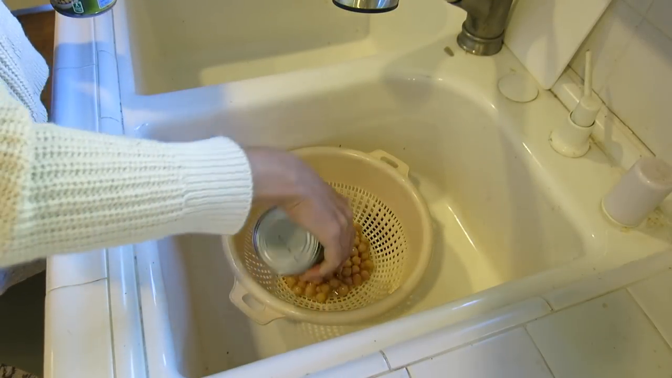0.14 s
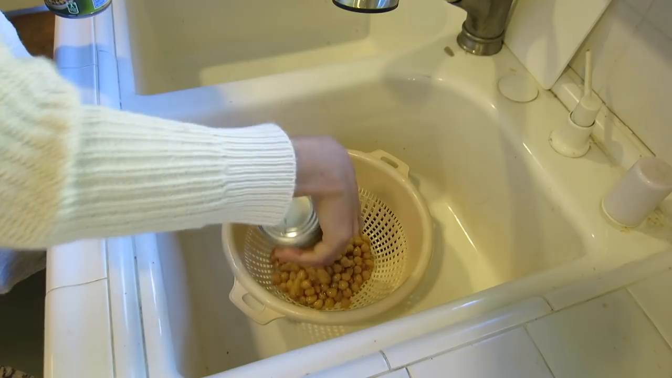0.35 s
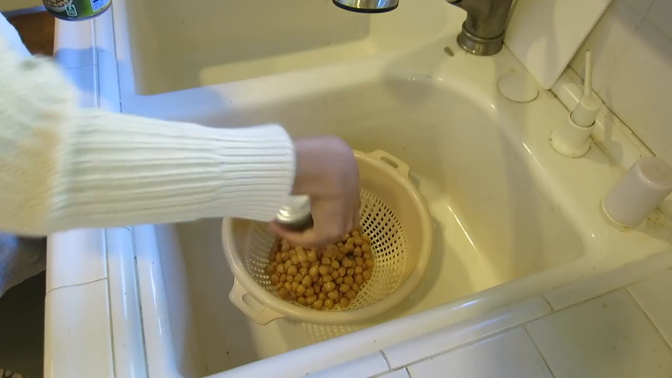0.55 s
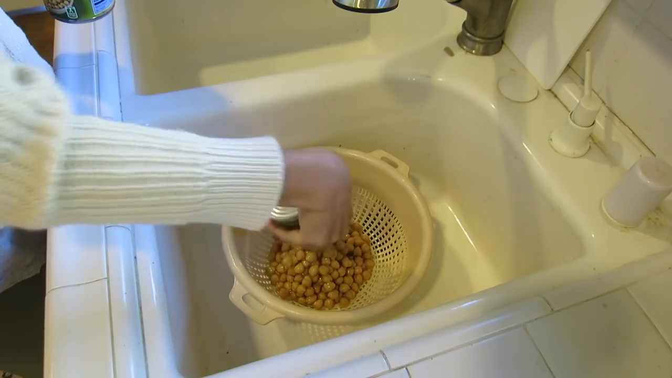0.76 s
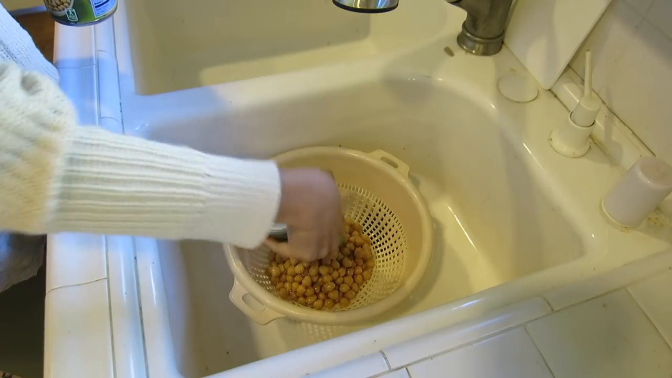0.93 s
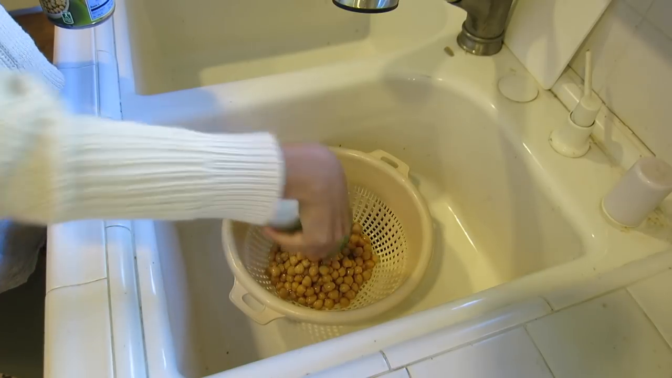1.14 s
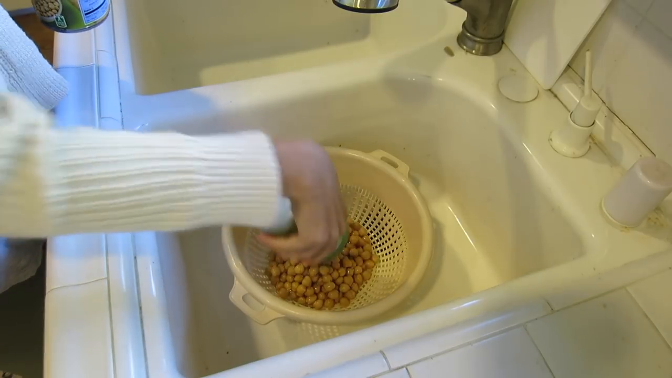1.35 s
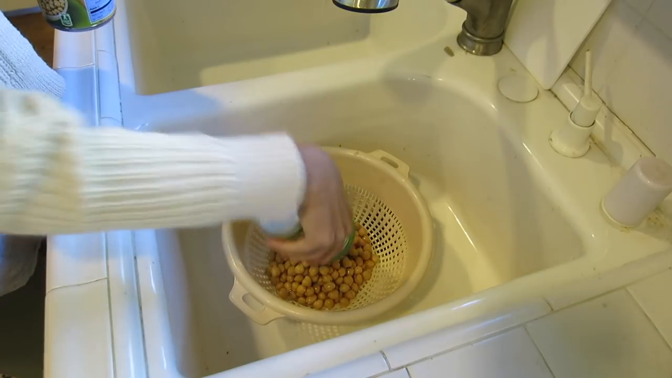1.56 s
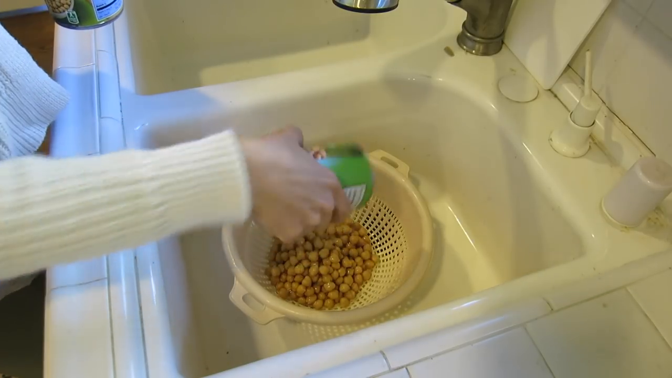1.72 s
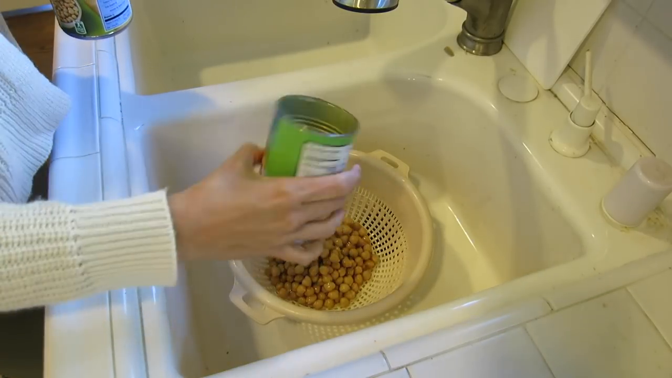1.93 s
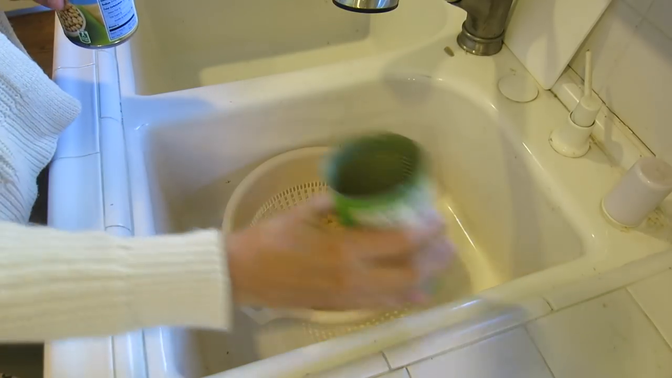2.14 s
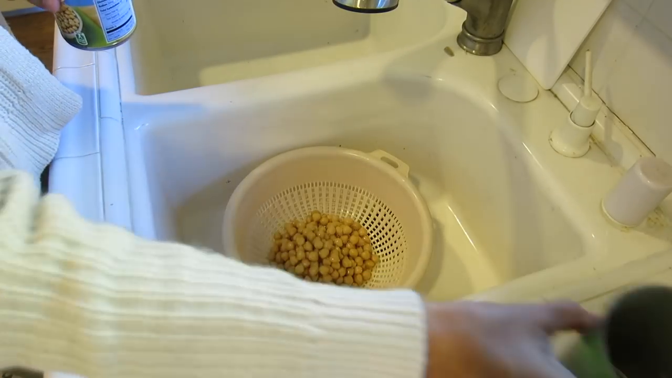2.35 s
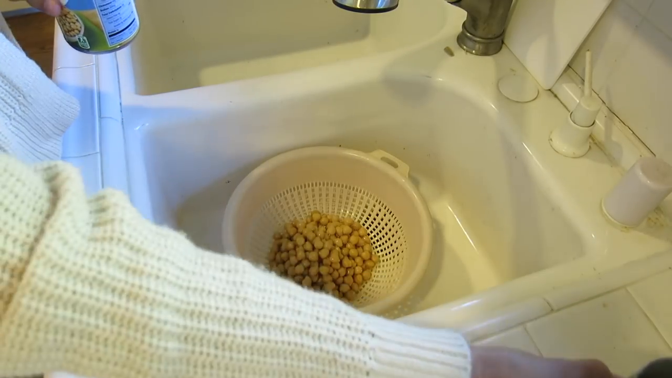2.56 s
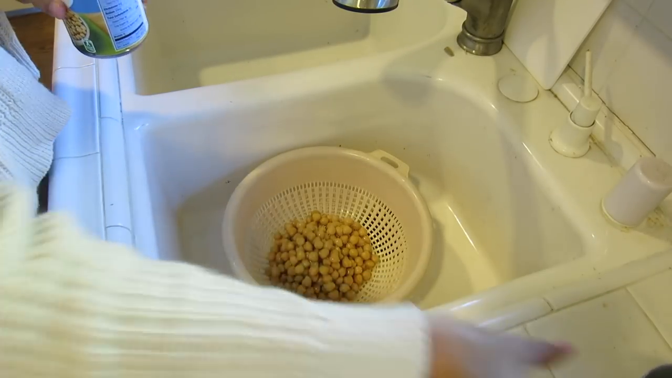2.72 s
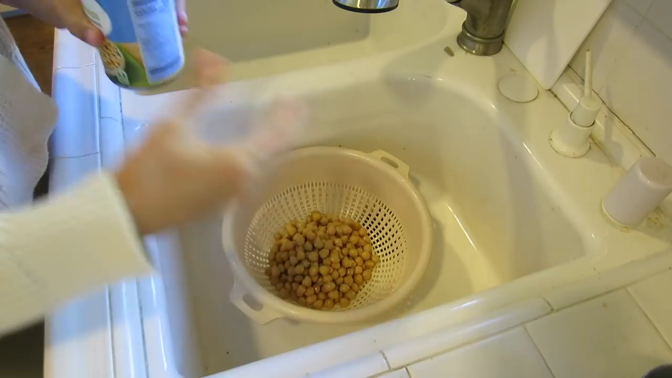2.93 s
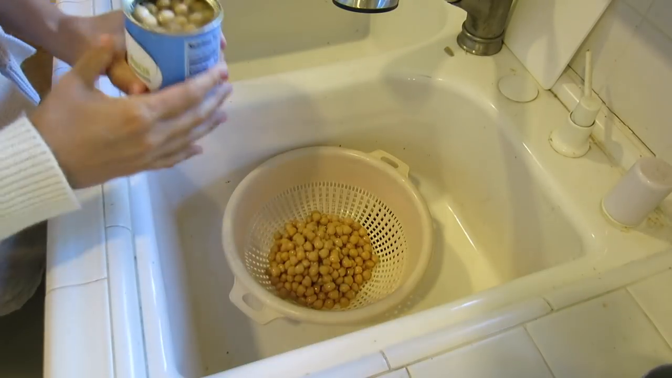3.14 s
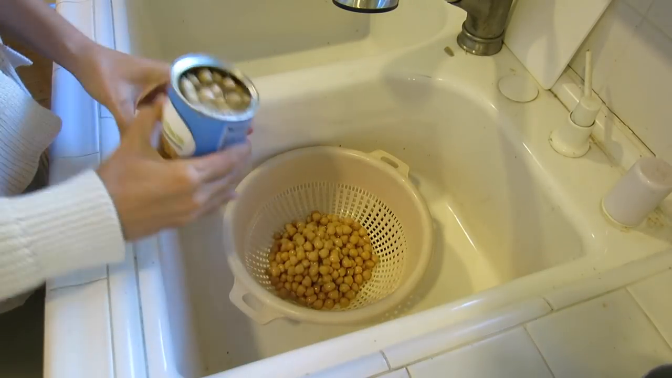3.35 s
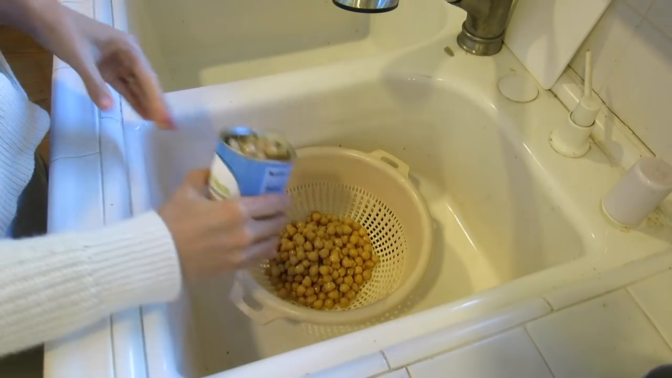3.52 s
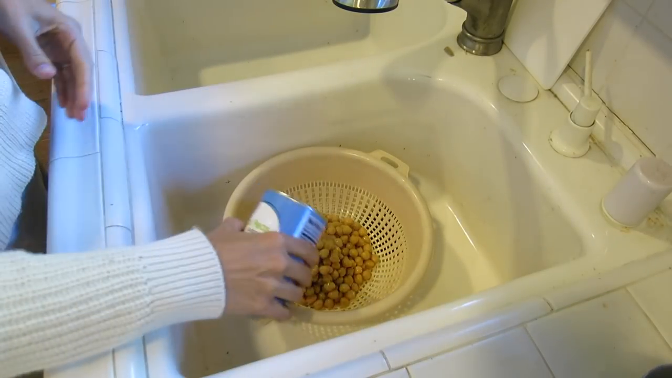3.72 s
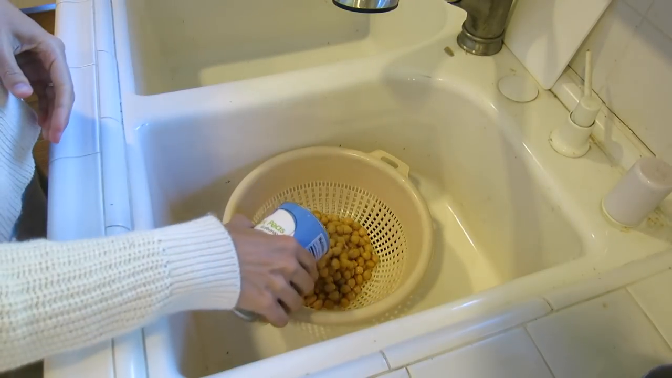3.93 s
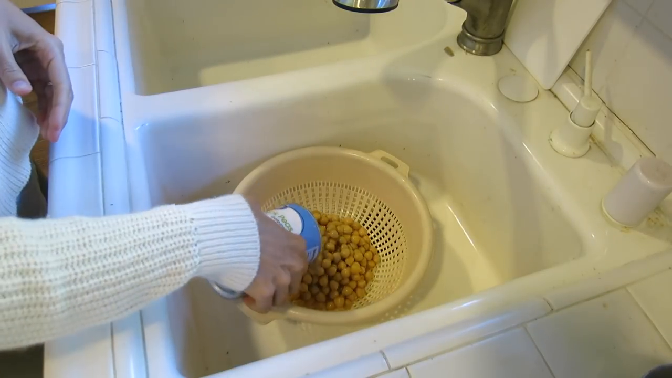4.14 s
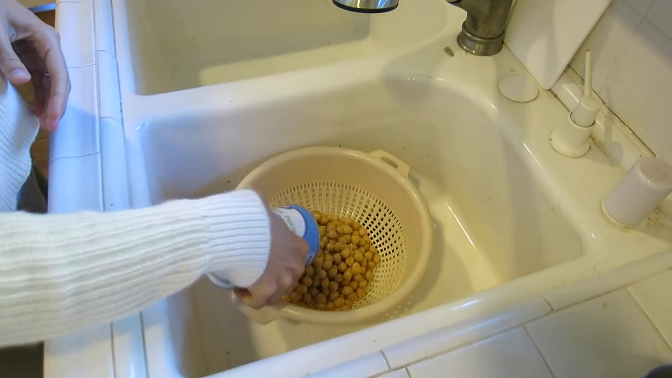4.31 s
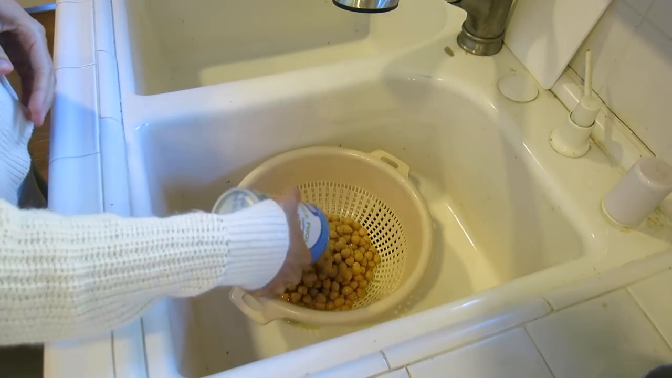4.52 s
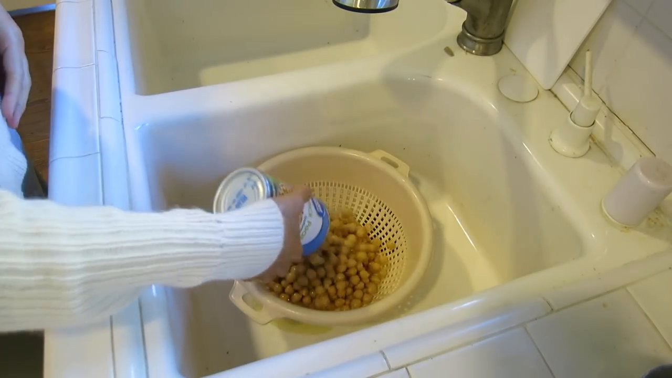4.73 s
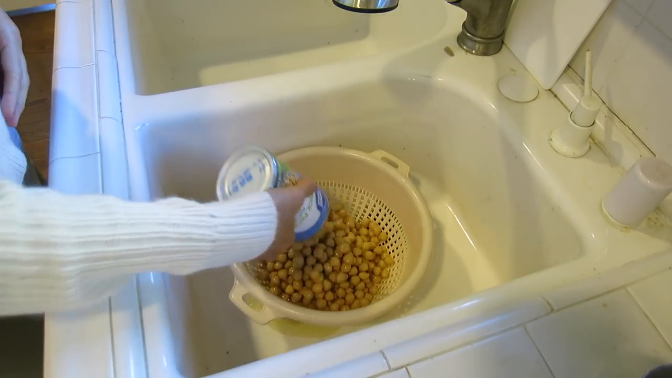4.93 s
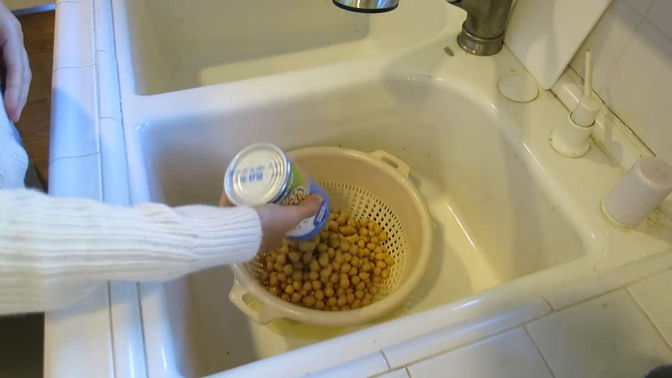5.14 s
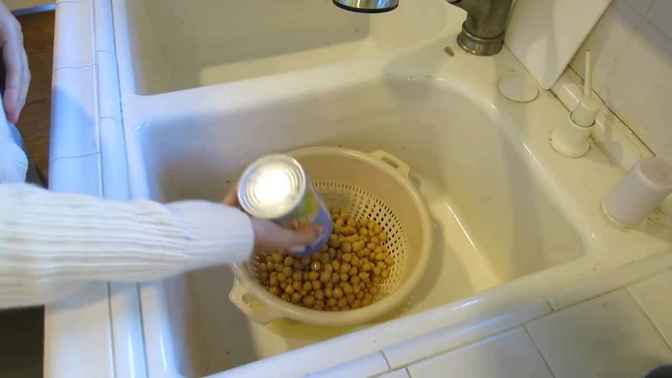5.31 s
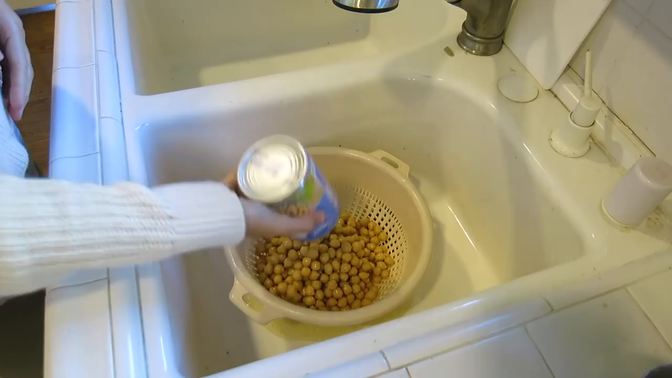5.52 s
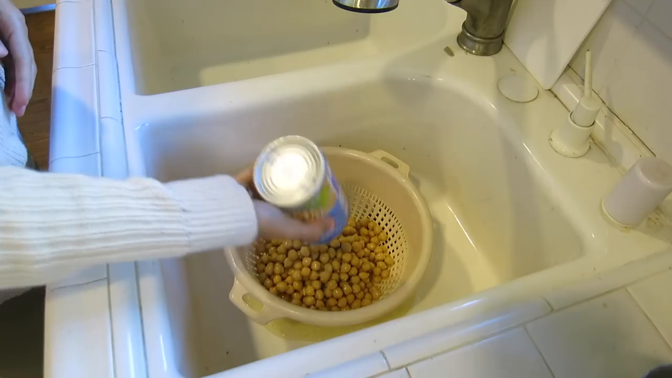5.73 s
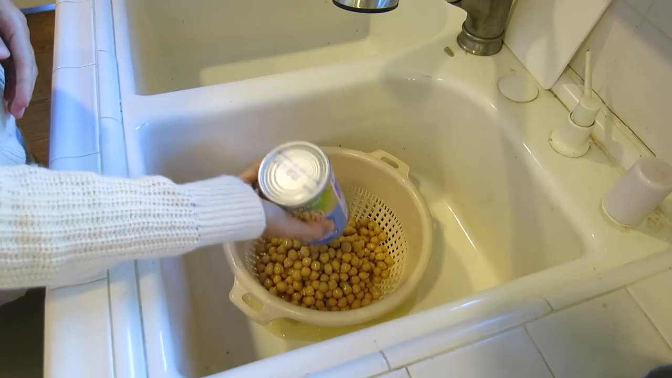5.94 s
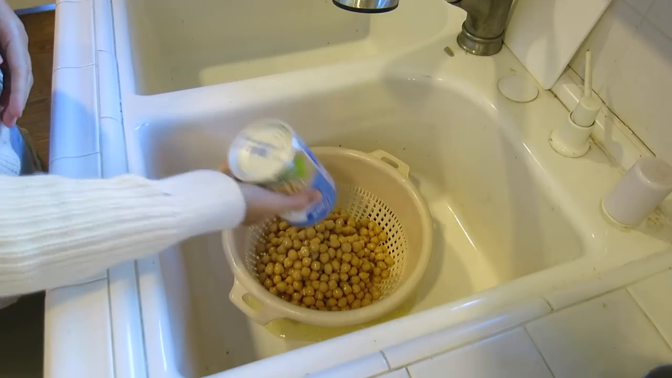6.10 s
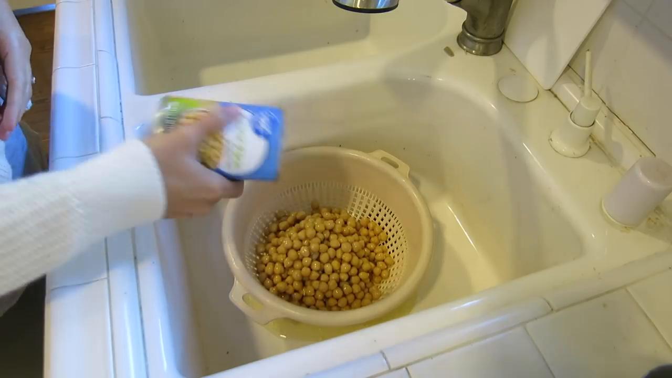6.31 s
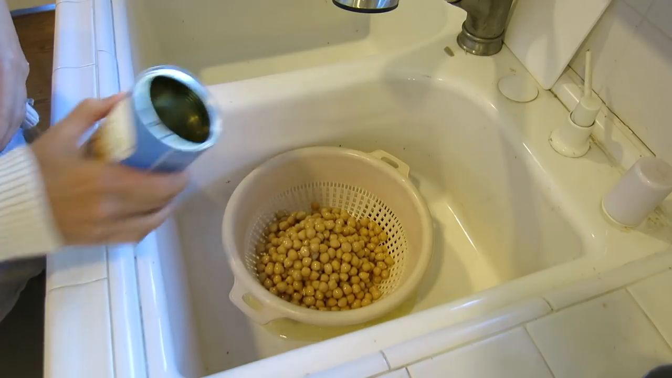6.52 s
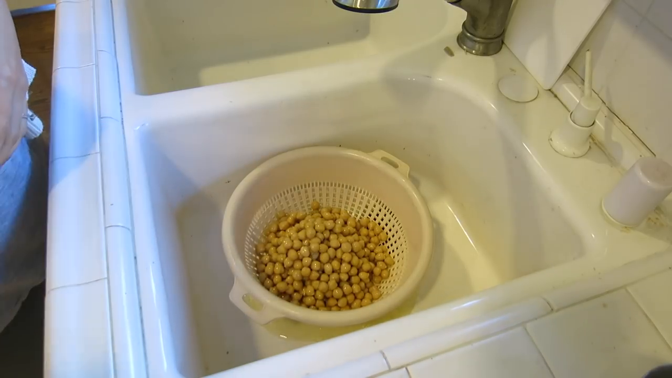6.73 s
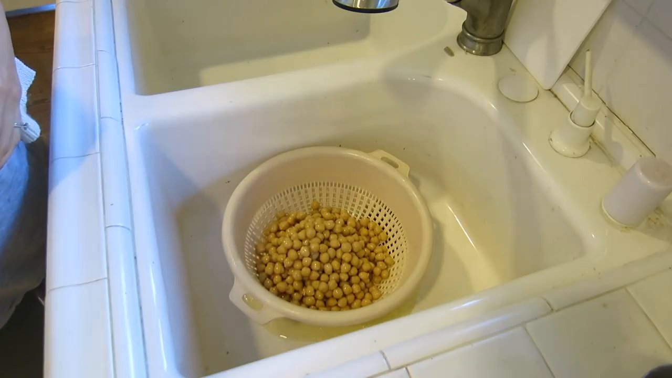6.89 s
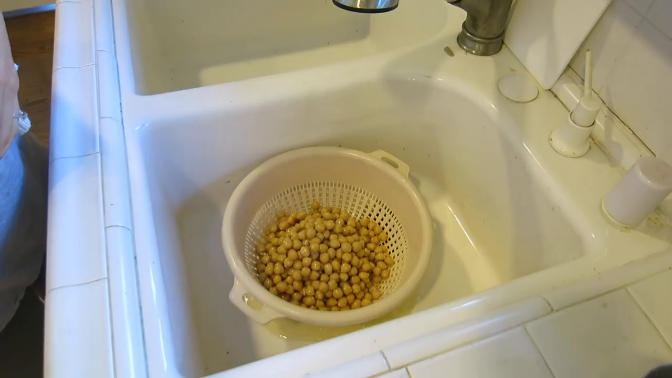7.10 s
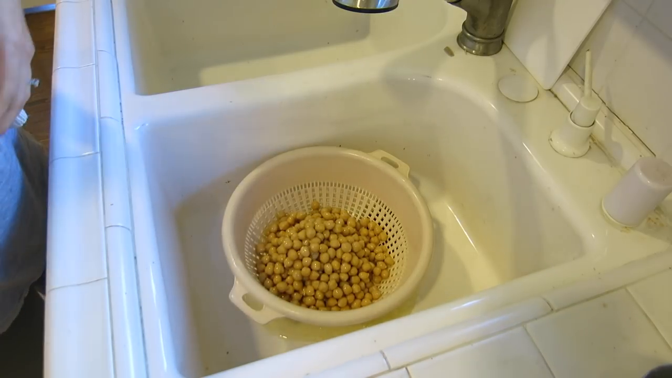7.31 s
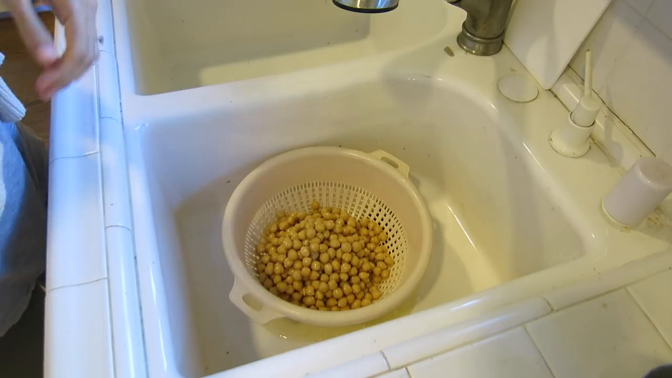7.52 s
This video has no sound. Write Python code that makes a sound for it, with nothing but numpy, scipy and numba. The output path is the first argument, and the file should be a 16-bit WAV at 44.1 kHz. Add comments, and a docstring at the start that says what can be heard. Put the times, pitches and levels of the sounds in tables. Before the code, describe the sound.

Stereo microphone near the basin, small live kitchen. Sharp can taps and fizzing brine come first, thinning to sparse clicks, then a hard steel clank. Label rustle and drops lead into a denser second pour, chickpeas slapping in clumps with gulping air. High drips thin out before a final clank that rocks and rings over faint hum and hiss.

```python
"""Wet chickpeas leave two cans for a colander in a sink: swarms of tiny bubbles squelch and crackle.
Clumps plop (and the can first rattles) as noise slaps with bubbles; brine drips plink, air gurgles and glugs.
Each empty can is set down hard on tiles: noise cracks, a bright tick and ringing steel modes.
Sink and kitchen add noise-tail echoes over rubbing hiss, a background of rumble and wide hiss, and fridge hum.
A gain control ducks overloads, most plainly at the two knocks, and recovers slowly."""
import sys
import numpy as np
from scipy import signal
from scipy.fft import rfft, irfft
from scipy.io import wavfile
from scipy.ndimage import uniform_filter1d
from numba import njit

SR = 44100
rng = np.random.default_rng(int(sys.argv[2]) if len(sys.argv) > 2 else 0)


def generate_wav(signal):
    """Clip the signal to [-1, 1] and save it as 16-bit WAV at the path in sys.argv[1]."""
    frames = np.transpose(np.atleast_2d(signal))
    scaled = np.clip(frames, -1, 1) * 32767
    pcm = np.round(scaled).astype(np.int16)
    wavfile.write(sys.argv[1], SR, pcm)


N = 337806
TIME = np.arange(N) / SR
TOP_HZ = 15800  # upper band limit


def amp(db):
    """Decibels to gain."""
    return 10 ** (np.asarray(db) / 20)


def unit(x):
    """Scale to rms 1."""
    return x / np.sqrt(np.mean(x ** 2))


def seconds(length_s):
    """Time axis of a short sound."""
    return TIME[:int(length_s * SR) + 2]


def fade(t, t60):
    """Exponential decay, 60 dB in t60."""
    return np.exp(-np.log(1000) * t / t60)


def add(track, start_s, sound):
    """Mix a sound into a track at start_s."""
    i = min(max(int(start_s * SR), 0), N)
    track[i:i + len(sound)] += sound[:N - i]


def colour(x, points, keep_power=True, size=4096):
    """Minimum-phase filter through (Hz, dB) points; by default white noise keeps its power."""
    hz, db = np.transpose(points)
    bin_hz = np.fft.rfftfreq(size, 1 / SR)
    gain = amp(np.interp(np.log(bin_hz + 1), np.log(hz), db))
    # folding the cepstrum makes the response causal
    cepstrum = irfft(np.log(gain))
    cepstrum[1:size // 2] *= 2
    cepstrum[size // 2 + 1:] = 0
    response = irfft(np.exp(rfft(cepstrum)))
    if keep_power:
        response = response / np.linalg.norm(response)
    return signal.fftconvolve(x, response)[:N]


def walk(rate_hz):
    """Smooth random wander with rms 1, one new value per 1 / rate_hz."""
    k = int(SR / rate_hz)
    steps = np.repeat(rng.standard_normal(N // k + 1), k)[:N]
    return unit(uniform_filter1d(uniform_filter1d(steps, k), k))


def bursts(starts_s, levels_db, rise, t60):
    """A short decaying rush of noise for each contact; rise and t60 in s."""
    out, t = np.zeros(N), seconds(t60 + rise)
    shape = (1 - np.exp(-t / rise)) * fade(t, t60)
    shape = shape / shape.max()
    for start_s, level_db in zip(starts_s, levels_db):
        add(out, start_s, amp(level_db) * shape * rng.standard_normal(len(t)))
    return out


def bubble(hz, cycles, glide):
    """A damped ring whose pitch climbs as the bubble nears the surface."""
    t = seconds(cycles / hz)
    age = t * hz / cycles  # 0 to 1 over its life
    ring = np.sin(2 * np.pi * hz * t * (1 + glide * age / 2))
    return ring * fade(age, 0.84) * (1 - np.exp(-t * hz))


def grains(low_hz, high_hz, cycles, spread_db, count):
    """A swarm of tiny bursting films and bubbles of all sizes, rms 1."""
    out = np.zeros(N)
    for when, pitch, size in rng.random((count, 3)):
        hz = min(low_hz * (high_hz / low_hz) ** pitch, TOP_HZ)
        strength = amp(spread_db * min(-np.log(1 - size), np.pi))
        add(out, when * N / SR, strength * np.sqrt(hz) * bubble(hz, cycles, glide=0.25))
    return unit(out)


# peas sliding out, one table per can, levels before trim: time_s, squelch_db, crackle_db
POUR_LEVELS = [
    [(0.0, -53, -48), (0.13, -45, -41.5), (0.49, -51, -59.5), (0.89, -52, -63.5), (1.09, -59.5, -67),
     (1.54, -56, -71), (1.89, -61, -69), (2.21, -65, -84), (2.4, -53, -81)],
    [(3.7, -60, -56.5), (3.89, -49, -53), (4.05, -48, -45), (4.22, -39, -46), (4.5, -46, -48.5),
     (4.89, -33.5, -57), (5.01, -35, -50), (5.61, -55.5, -82), (5.8, -68, -73)],
]
# squelch spectrum: freq_hz, level_db
SQUELCH_SPECTRUM = [(120, -23), (280, 3.5), (550, -0.5), (1200, 2.5), (2200, -6), (3300, -19),
                    (6000, -22.5)]
# brine crackle spectrum: freq_hz, level_db
CRACKLE_SPECTRUM = [(1500, 10.5), (3300, -10.5), (5500, -5.5), (10000, -4.5), (12500, -3.5), (15000, -15)]
# span of the wet heap's fizz: start_s, end_s
DRAIN_SPAN = (3.9, 7.3)
DRAIN_FIZZ_DB = -69


def pouring(squelch_trim_db=-7.5, crackle_trim_db=-1.0, patchy_db=3.0):
    """Sticky peas part: a dense low squelch and a fine crackle of brine, plus a faint fizz as it drains."""
    squelch = grains(low_hz=255.0, high_hz=4620, cycles=10.2, spread_db=4.0, count=8000)
    squelch = unit(colour(squelch, SQUELCH_SPECTRUM))
    crackle = grains(low_hz=2506, high_hz=16700, cycles=12.8, spread_db=7.0, count=14000)
    # peas let go in fits: patchy crackle
    crackle = unit(colour(crackle, CRACKLE_SPECTRUM) * amp(patchy_db * walk(70)))
    draining = (TIME > DRAIN_SPAN[0]) * (TIME < DRAIN_SPAN[1])
    out = crackle * amp(DRAIN_FIZZ_DB) * draining
    silent = dict(left=-np.inf, right=-np.inf)  # outside each pour
    for pour in POUR_LEVELS:
        time_s, squelch_db, crackle_db = np.transpose(pour)
        out += squelch * amp(np.interp(TIME, time_s, squelch_db, **silent) + squelch_trim_db)
        out += crackle * amp(np.interp(TIME, time_s, crackle_db, **silent) + crackle_trim_db)
    return out


# plops of landing clumps; the first rows near 2 kHz are can rattles and knocks
# levels before trim: start_s, slap_db, body_db, pitch_hz
PLOPS_AND_RATTLES = [(0.005, -22.5, -45, 1630), (0.092, -17.5, -63, 2250), (0.1, -24, -60, 2300),
                     (0.125, -27, -59, 2100), (0.185, -29, -51, 2000), (0.258, -33, -60, 3300),
                     (0.38, -39, -42.5, 1490), (0.425, -36.5, -44, 920), (0.46, -33.5, -49, 2800),
                     (0.628, -43, -43, 636), (0.8, -43, -43, 2100), (0.822, -39.5, -43.5, 1370),
                     (0.872, -50, -46, 700), (0.955, -44, -41, 637), (1.21, -48, -46, 664),
                     (1.501, -40, -63, 980), (1.835, -41.5, -68, 776), (4.185, -23, -46.5, 1356),
                     (4.194, -31, -48, 1880), (4.457, -31.5, -35, 1970), (4.533, -42, -29.5, 1090),
                     (4.573, -34, -29.5, 950), (4.609, -45, -51, 1070), (4.69, -18.5, -27, 1000),
                     (4.712, -26, -35, 2300), (4.742, -20.5, -32, 1480), (4.757, -11.5, -31, 1026),
                     (4.781, -29, -30, 755), (4.793, -28, -38, 1300), (4.817, -19.5, -38, 950),
                     (4.845, -15, -34, 1300), (4.856, -25, -35, 804), (4.89, -16, -35, 1150),
                     (4.903, -24, -38, 1500), (4.966, -25.5, -28.5, 890), (5.002, -21.5, -29, 900),
                     (5.04, -29, -49, 1010), (5.118, -37, -43, 1120), (5.158, -33, -26, 820),
                     (5.342, -23.5, -28, 810), (5.538, -28.5, -40, 1566), (5.634, -23, -38.5, 1730)]
# dull body spectrum: freq_hz, level_db
BODY_SPECTRUM = [(40, -61), (130, -18), (250, 4.5), (550, 4.5), (900, -6), (1500, -31), (4000, -33.5)]
# slap spectrum: freq_hz, level_db
SLAP_SPECTRUM = [(60, -55), (300, -11), (750, 2), (1150, -3.5), (2200, 3), (3200, -15), (6000, -24.5),
                 (15000, -37)]


def plops_and_rattles(thud_db=-4, bump_db=-4, bump_hz=450, spatter_db=-11, pocket_db=5,
                      followers_db=-6, scatter=0.381, count=6):
    """Each plop or rattle: dull noise body, quick noise slap, one bubble ring, then smaller rings and bumps."""
    starts_s, slaps_db, bodies_db, _ = np.transpose(PLOPS_AND_RATTLES)
    out = colour(bursts(starts_s, bodies_db + thud_db, rise=0.0042, t60=0.1), BODY_SPECTRUM)
    out += colour(bursts(starts_s, slaps_db + spatter_db, rise=0.00017, t60=0.034), SLAP_SPECTRUM)
    for start_s, slap_db, body_db, hz in PLOPS_AND_RATTLES:
        add(out, start_s, amp(slap_db + pocket_db) * bubble(hz, cycles=17.4, glide=0.13))
        delays_s = .016 * rng.random(count)
        # for a clump: peas that follow and bump the colander
        for delay_s, pitch, weight in zip(delays_s, *rng.standard_normal((2, count))):
            follower = bubble(hz * np.exp(scatter * pitch), cycles=20, glide=0.78)
            bump = bubble(bump_hz * np.exp(0.35 * weight), cycles=6.2, glide=0.05)
            later = fade(delay_s, t60=0.11)
            add(out, start_s + delay_s, later * amp(slap_db + followers_db) * follower)
            add(out, start_s + delay_s, later * amp(body_db + bump_db) * bump)
    return out


# wet snaps and taps on the can, levels before trim: start_s, level_db
CLICKS = [(0.0054, -17.5), (0.0482, -19.5), (0.0927, -24.5), (0.114, -30), (0.126, -31), (0.2578, -28),
          (0.294, -34.5), (0.39, -33), (0.4075, -24.5), (0.417, -32), (0.4584, -33), (0.4742, -30.5),
          (0.775, -21), (1.0142, -41), (1.8438, -39), (1.9712, -39.5), (2.0493, -45.5), (2.1723, -38),
          (2.2509, -42.5), (3.128, -37), (3.2595, -35.5), (3.3743, -22.5), (3.972, -39), (3.9888, -28),
          (4.001, -31), (4.029, -29.5), (4.077, -25.5), (4.2378, -29), (5.8416, -33.5)]
# bright click spectrum, also the cans' tick: freq_hz, level_db
CLICK_SPECTRUM = [(500, -21), (2000, -2.5), (3200, -11), (5000, -1), (8000, -0.5), (11500, 2.5),
                  (15000, -11)]


def snaps(spray_db=-10.0, pulse_db=12.0):
    """Bright clicks: a sharp pulse and a few milliseconds of spray."""
    starts_s, levels_db = np.transpose(CLICKS)
    out = bursts(starts_s, levels_db + spray_db, rise=0.0017, t60=0.013)
    for start_s, level_db in CLICKS:
        add(out, start_s + 0.00056, amp([level_db + pulse_db]))
    return colour(out, CLICK_SPECTRUM)


# brine drops, level before trim, splash relative to it: start_s, level_db, pitch_hz, splash_db
DROPS = [(0.165, -10.5, 6270, -35), (0.892, -28, 4900, -11.5), (3.473, -26, 9500, -27),
         (3.6105, -23.5, 9860, -29), (3.64, -30.5, 7240, -15), (3.7367, -27, 9500, -13.5),
         (3.7855, -29, 6700, -4), (3.8346, -25.5, 8600, -13), (3.858, -31, 9300, -26),
         (3.905, -34, 9100, -11), (3.912, -21, 7400, -15), (3.971, -29.5, 6540, -27),
         (4.0636, -33.5, 4500, -13), (4.1026, -15.5, 9630, -22), (4.153, -35, 8200, -4),
         (4.2078, -30, 5230, -18), (4.2282, -29, 6200, -18), (4.309, -22, 5720, -31),
         (4.359, -32, 5700, -20), (4.4025, -33, 9810, -11), (4.438, -33, 5480, -15),
         (4.563, -49, 6900, -22), (4.6335, -33, 9730, -10), (4.648, -29, 9000, -13),
         (4.6945, -31, 9100, -6), (4.7315, -32, 7700, -6.5), (4.7535, -33, 4040, -2),
         (4.7905, -35, 6700, -4), (4.868, -29, 4870, -22), (4.9105, -28, 9100, -25),
         (5.006, -22, 7070, -27), (5.0406, -19, 7970, -16.5), (5.222, -41, 8430, -22),
         (5.2395, -26.5, 8950, -31), (5.2985, -22.5, 10050, -31), (5.3415, -28.5, 8300, -14),
         (5.437, -31, 8400, -16), (5.4835, -37, 9800, -23), (5.5445, -31.5, 6900, -20),
         (5.68, -34, 6400, -18), (5.7416, -33.5, 6200, -9), (5.801, -43, 9500, -13),
         (5.8292, -38, 6900, -8), (5.885, -29.5, 7000, -30), (5.9388, -31, 9100, -27),
         (5.9854, -33.5, 7400, -24), (5.9942, -34.5, 6400, -13.5), (6.027, -42, 9640, -9),
         (6.0565, -39.5, 8800, -9), (6.0884, -36.5, 9600, -6.5), (6.103, -38.5, 8900, -13),
         (6.138, -45, 9200, -11), (6.162, -45, 11900, -11), (6.2158, -35.5, 6760, -14),
         (6.2776, -47, 6400, -3), (6.3077, -38.5, 8000, -12.5), (6.3508, -33.5, 9800, -19),
         (6.38, -31, 9270, -18), (6.4867, -30.5, 9100, -14), (6.4967, -33, 7030, -7.5),
         (6.577, -39, 9200, -9), (6.6094, -36, 9300, -14), (6.765, -44.5, 5370, -1),
         (6.789, -44, 6250, -12), (6.835, -41, 7050, -15), (6.859, -42.5, 10200, -7),
         (6.9721, -41, 9440, -21), (7.0535, -27.5, 10400, -30), (7.064, -29, 10000, -24),
         (7.0946, -29.5, 11100, -17.5), (7.1284, -32.5, 6800, -27), (7.2526, -34, 11800, -10),
         (7.2704, -29.5, 6550, -22), (7.283, -30.5, 10200, -21)]
# splash spectrum: freq_hz, level_db
SPLASH_SPECTRUM = [(1000, -16), (2600, -15), (3300, -6), (3800, -12.5), (4600, -2), (6300, 3), (8000, 5),
                   (11500, 3), (15000, -3.5)]


def drips(ring_db=-2.0, satellite_db=-8, spread_s=0.0024, lag_s=.0011, scatter=0.22, count=3):
    """Each drop splashes, its trapped bubble gives one short plink, and a few weaker ones burst with it."""
    starts_s, levels_db, _, splashes_db = np.transpose(DROPS)
    splash = bursts(starts_s + lag_s, levels_db + splashes_db, rise=0.00031, t60=0.037)
    out = colour(splash, SPLASH_SPECTRUM)
    for start_s, level_db, hz, _ in DROPS:
        add(out, start_s + lag_s, amp(level_db + ring_db) * bubble(hz, cycles=92, glide=0.07))
        for delay_s, pitch in zip(spread_s * rng.random(count), rng.uniform(-0.56, 1, count)):
            satellite = bubble(hz * np.exp(scatter * pitch), cycles=85.0, glide=0.14)
            add(out, start_s + lag_s + delay_s, amp(level_db + satellite_db) * satellite)
    return out


# air squeezing in past the peas: start_s, start_pitch_hz, level_db
AIR_STRINGS = [(0.814, 1190, -43), (4.024, 1415, -30.5), (4.499, 1067, -25.5)]


def gurgles(climb_per_s=4.7, length_s=0.072, jitter=0.046, count=9):
    """A quick string of bubbles whose pitch climbs, with a little jitter, as air squeezes in."""
    out = np.zeros(N)
    for start_s, start_hz, level_db in AIR_STRINGS:
        for delay_s, pitch in zip(length_s * rng.random(count), rng.standard_normal(count)):
            hz = start_hz * np.exp(climb_per_s * delay_s + jitter * pitch)
            add(out, start_s + delay_s, amp(level_db) * bubble(hz, cycles=19, glide=0.25))
    return out


# gulped air ringing the can's cavity: start_s, pitch_hz, level_db, length_s
GULPS = [(0.313, 648, -51.5, 0.24), (0.602, 656, -46.5, 0.075), (0.8, 530, -43, .04),
         (0.935, 500, -40, 0.032), (1.025, 510, -43.5, 0.034), (4.53, 472.4, -36, 0.032),
         (4.72, 522, -35, 0.14), (4.913, 570, -33, 0.022), (4.96, 560, -24.5, 0.17),
         (5.138, 569, -31, .035), (5.179, 586, -22, 0.033), (5.255, 596, -44, .04),
         (5.349, 596, -21.5, 0.033)]
GLUG_SWELL_S = 0.0091
GLUG_RISE_PER_S = 0.15  # phase factor; relative pitch climbs at twice this


def glugs(sag_db_per_s=50, release_t60=0.084, rough_db=2.0, wobble_rad=0.39):
    """Air in the can swells into a hollow, slightly rising note, sags while air flows, then rings out."""
    out, t = np.zeros(N), seconds(.4)
    for start_s, hz, level_db, length_s in GULPS:
        swell = np.minimum(t / GLUG_SWELL_S, 1)
        release = fade(np.maximum(t - length_s, 0), release_t60)
        shape = swell * amp(-sag_db_per_s * t) * release
        phase = 2 * np.pi * hz * t * (1 + GLUG_RISE_PER_S * t) + wobble_rad * walk(87)[:len(t)]
        add(out, start_s, amp(level_db) * shape * np.sin(phase))
    return out * amp(rough_db * walk(110))


PING_S = 5.378  # second can runs empty
# modes of that can while held: freq_hz, level_db, t60_s
HELD_MODES = [(890, -45, 0.27), (1084, -50, 0.41), (3560, -55, 0.17), (4600, -55, 0.19), (5303, -56, .18),
              (6100, -52, 0.13)]


def can_ping():
    """The last peas leave the can in the hand, and its wall rings faintly."""
    out, t = np.zeros(N), seconds(.6)
    for hz, level_db, t60 in HELD_MODES:
        add(out, PING_S, amp(level_db) * np.sin(2 * np.pi * hz * t) * fade(t, t60))
    return out


# hands and sleeve sliding over paper labels: centre_s, level_db, half_width_s
RUB_STROKES = [(0.01, -57, 0.025), (0.406, -58, 0.029), (0.813, -55, 0.03), (1.743, -68.5, 0.22),
               (2.283, -64, 0.15), (3.285, -53.5, 0.12), (3.39, -49, 0.026), (4.095, -49, 0.057)]
# rub spectrum: freq_hz, level_db
RUB_SPECTRUM = [(500, -6), (3000, -17.5), (6000, -11.5), (11500, -2.5), (15500, -12)]


def rubs():
    """Skin and wool on paper: a fine, slightly uneven hiss that swells and fades."""
    pressure = np.zeros(N)
    for centre_s, level_db, half_width_s in RUB_STROKES:
        pressure += amp(level_db) * np.exp(-((TIME - centre_s) / half_width_s) ** 2)
    return pressure * amp(2 * walk(60)) * colour(rng.standard_normal(N), RUB_SPECTRUM)


# first can on the tiles, levels before trim: start_s, crack_db, ring_db
FIRST_CONTACTS = [(2.619, 7, -0.5), (2.6215, -5, -15.5), (2.645, -13, -24), (2.654, -6, -11),
                  (2.743, -25, -29.5)]
# second can, rocking before it settles, levels before trim: start_s, crack_db, ring_db
SECOND_CONTACTS = [(7.363, 7.5, 3), (7.366, 4.5, -16), (7.383, -8, -21), (7.395, -12, -27),
                   (7.447, -28, -9.5), (7.497, -14.5, -16), (7.514, -10, -14), (7.645, -28, -38)]
# modes of the first empty can, relative: freq_hz, level_db, t60_s
FIRST_MODES = [(432, -14, .14), (508, 1, 0.25), (572, -7, .2), (684, -16, 0.42), (967, -13, 0.42),
               (1087, -15, 0.45), (1283, -14, 0.42), (1347, -9, .34), (1380, -11, .4), (1658, -22, .35),
               (1980, -21, .3), (2164, -16, .3), (2225, -16, .33), (2309, -17, 0.38), (2365, -18, .36),
               (2545, -21, .36), (2910, -18, 0.18), (4485, -23, .33), (5340, -24, .37), (5523, -24, .42),
               (6982, -21, .2), (8750, -27, .17)]
# modes of the second empty can, relative: freq_hz, level_db, t60_s
SECOND_MODES = [(585, -15, .35), (631, -3.5, 0.68), (692, -6.5, 0.7), (740, -16, .3), (909, -16, 0.59),
                (1023, -11.5, .7), (1090, -4.5, 0.43), (1940, -10, 0.55), (2008, -13, 0.65),
                (2110, -12, .4), (2169, 0, 0.38), (2285, -12, .27), (2363, -10, 0.2), (2862, -27, 0.7),
                (3740, -20, .3), (3850, -19, 0.2), (5570, -21, .45), (5660, -15, .33), (6630, -19, 0.33),
                (8382, -19, 0.28), (9900, -27, .28), (11010, -24, 0.28), (11600, -22, 0.28),
                (12300, -26, .25)]
# first can's crack spectrum: freq_hz, level_db
FIRST_SPECTRUM = [(30, -68), (150, -27.5), (300, 0), (550, 9), (1000, 8), (1700, 7), (2400, 6.5),
                  (3400, -8.5), (5000, -0.5), (8000, -4), (11500, -1), (15000, -14)]
# second can's crack spectrum: freq_hz, level_db
SECOND_SPECTRUM = [(30, -67), (150, -34), (330, -7.5), (460, 1.5), (650, 17), (1050, 14), (1500, 3.5),
                   (2200, 8), (2700, -9), (3800, 0.5), (4700, -1), (5600, -8), (6100, -21), (6600, -3),
                   (7400, -13), (8500, -3), (10200, -6), (11500, 2.5), (15000, -12)]
CHATTER_HZ = 2000  # modes above this ring more and more smoothly


def can_knock(contacts, modes, spectrum, tick_db, crack_db, ring_db, buzz_db, buzz_t60, split,
              cluster_db, rough_db, count=4):
    """The rim cracks on tile, the thin steel rings on and buzzes against it; gives (crack, ring)."""
    starts_s, cracks_db, rings_db = np.transpose(contacts)
    crack = bursts(starts_s, cracks_db + crack_db, rise=0.0001, t60=0.012)
    # hard contact: one bright tick each
    tick = np.zeros(N)
    for start_s, level_db in zip(starts_s, cracks_db):
        add(tick, start_s + .0003, amp([level_db + tick_db]))
    buzz = bursts(starts_s, rings_db + buzz_db, rise=0.0038, t60=buzz_t60)
    ring, t = np.zeros(N), seconds(0.88)
    for hz, mode_db, t60 in modes:
        # seam and ribs split each mode into a close cluster
        split_hz = hz * (1 + split * rng.standard_normal(count))
        neighbours = np.sin(2 * np.pi * (np.outer(split_hz, t) + rng.random((count, 1))))
        cluster = np.sin(2 * np.pi * hz * t) + amp(cluster_db) * neighbours.sum(axis=0)
        # the chattering rim roughens it
        chatter = amp(rough_db * min(1, CHATTER_HZ / hz) * walk(149)[:len(t)])
        tone = cluster * fade(t, t60) * chatter
        for start_s, blow_db in zip(starts_s, rings_db):
            add(ring, start_s, rng.choice([-1, 1]) * amp(ring_db + blow_db + mode_db) * tone)
    return colour(crack + buzz, spectrum) + colour(tick, CLICK_SPECTRUM), ring


# echo side against mid: freq_hz, level_db
ECHO_WIDTH = [(60, -21.5), (260, -17), (600, -9), (1400, -3.5), (2400, -8.5), (4500, -26), (7000, -30),
              (9500, -10.5), (13000, -1)]


def echoes(x, delay, t60, treble_t60, db, split_hz=3000):
    """Dense reflections as decaying noise tails, shorter in the treble; times in s; gives (mid, side)."""
    t = seconds(1.0)
    low_pass = signal.butter(2, split_hz, fs=SR, output="sos")
    pair = []
    for noise in rng.standard_normal((2, len(t))):
        low = signal.sosfilt(low_pass, noise)
        tail = (low * fade(t, t60) + (noise - low) * fade(t, treble_t60)) * (t > delay)
        pair.append(signal.fftconvolve(x, amp(db) * tail / np.linalg.norm(tail))[:N])
    return np.array([pair[0], colour(pair[1], ECHO_WIDTH, keep_power=False)])


# background rumble and hiss spectrum: freq_hz, level_db
FLOOR_SPECTRUM = [(15, -51.5), (25, -31), (87, -9.5), (102, -6), (123, -9.5), (149, -6.5), (242, -24),
                  (270, -14.5), (293, -20.5), (451, -24), (734, -26.5), (796, -25.5), (3430, -47),
                  (11600, -46), (16000, -52)]
# width of that background, side against mid: freq_hz, level_db
FLOOR_WIDTH = [(60, -30), (130, -17), (260, 5), (550, 10.5), (1100, 11), (2200, 11.5), (4000, -1.5),
               (6500, -12), (9500, -7), (13000, 1)]
# fridge tones before waver: freq_hz, rms_db
HUM_TONES = [(120.6, -45.5), (96, -61.5), (240.8, -59.5), (211.6, -60), (354.6, -66.5)]


def background(floor_db=-48.0, waver_db=1.5):
    """A wavering fridge hum over steady noise, a low rumble and a wide hiss; gives (mid, side)."""
    mid, side = (amp(floor_db) * colour(rng.standard_normal(N), FLOOR_SPECTRUM) for _ in range(2))
    for hz, rms_db in HUM_TONES:
        level = amp(rms_db + waver_db * walk(8.3))
        tone = unit(np.sin(2 * np.pi * hz * TIME + 0.16 * walk(6.0)))
        mid = mid + level * tone
    return np.array([mid, colour(side, FLOOR_WIDTH, keep_power=False)])


# rightward lean of the sink's sound, side against mid: freq_hz, level_db
SINK_LEAN = [(100, -34), (350, -19.5), (1300, -14.5), (2400, -16.5), (4500, -25.5), (15000, -44.5)]
RING_LEAN_DB = -17  # extra lean: empty cans stand further right


def scene():
    """Wet sounds and cracks echo off the basin close by; the room answers everything later."""
    wet = pouring() + rubs() + plops_and_rattles() + snaps() + gurgles() + drips() + can_ping()
    first = can_knock(FIRST_CONTACTS, FIRST_MODES, FIRST_SPECTRUM, tick_db=5, crack_db=0, ring_db=-10,
                      buzz_db=-33.5, buzz_t60=0.57, split=.014, cluster_db=-7, rough_db=3.0)
    second = can_knock(SECOND_CONTACTS, SECOND_MODES, SECOND_SPECTRUM, tick_db=3.5, crack_db=1.5,
                       ring_db=-10.0, buzz_db=-25, buzz_t60=0.59, split=0.0123, cluster_db=-6.5,
                       rough_db=3.5)
    crack, ring = np.add(first, second)
    hollow = glugs()
    basin = echoes(wet + amp(-2.5) * crack, delay=.002, t60=0.027, treble_t60=0.025, db=-3.5)
    room_send = amp(-1.0) * wet + amp(-3.0) * crack + amp(-6.5) * ring + amp(-5.5) * hollow
    room = echoes(room_send, delay=0.01, t60=0.51, treble_t60=0.25, db=-6.5)
    mid, side = basin + room
    mid = mid + wet + crack + ring + hollow
    # negative side leans right
    side = side - colour(mid, SINK_LEAN, keep_power=False) - amp(RING_LEAN_DB) * ring
    mid, side = np.array([mid, side]) + background()
    return np.array([mid + side, mid - side])


@njit
def follow(excess, attack, hold, release):
    """Level that jumps up with overload, holds a moment and creeps back; times in s."""
    out, held, age = np.empty(len(excess)), 0., 0.
    for i in range(len(excess)):
        age += 1 / SR
        if excess[i] > held:
            held += (excess[i] - held) / (SR * attack)
            age = 0.
        elif age > hold:
            held -= held / (SR * release)
        out[i] = held
    return out


LOOK_AHEAD_S = .0012


def record(dry, threshold_db=-14.5, ratio=2.45):
    """Gain control ducks just ahead of an overload, any peak past full scale clips, and the top is cut."""
    level_db = 20 * np.log10(np.abs(dry).max(axis=0) + 1e-9)
    excess_db = np.maximum(level_db - threshold_db, 0)
    held_db = follow(excess_db, attack=0.000095, hold=0.13, release=0.5)
    reduction_db = held_db * (1 - 1 / ratio)
    gain = amp(-np.interp(TIME + LOOK_AHEAD_S, TIME, reduction_db))
    clipped = np.clip(dry * gain, -1, 1)
    return signal.sosfilt(signal.ellip(8, .2, 70, TOP_HZ, fs=SR, output="sos"), clipped)


dry = scene()
out = record(dry)
generate_wav(out)
```